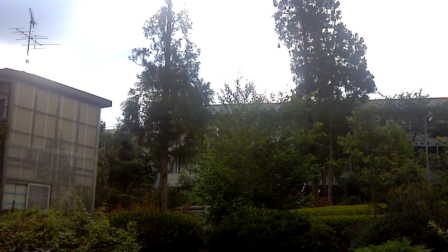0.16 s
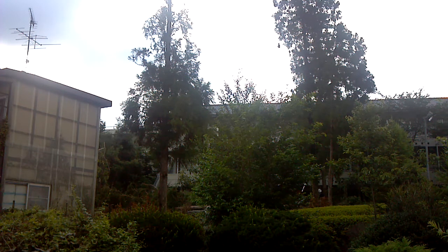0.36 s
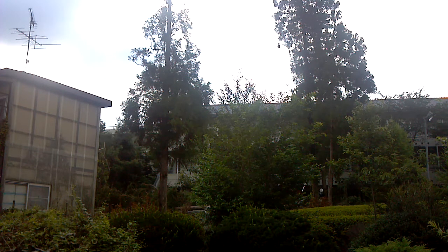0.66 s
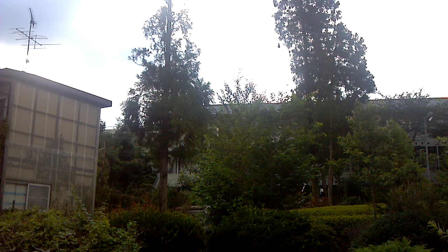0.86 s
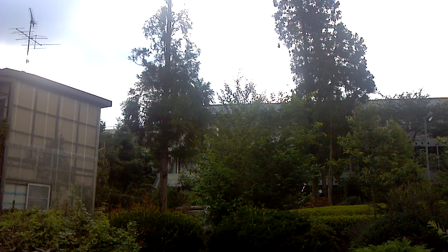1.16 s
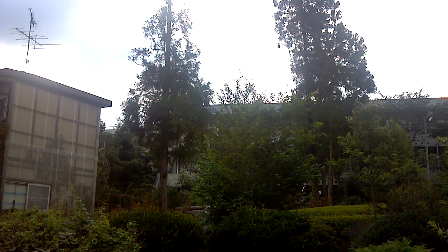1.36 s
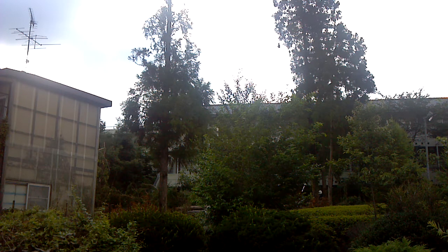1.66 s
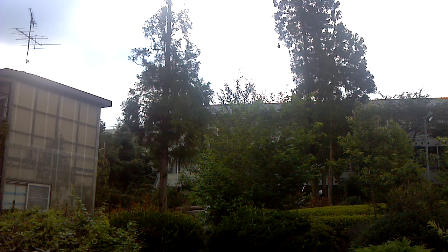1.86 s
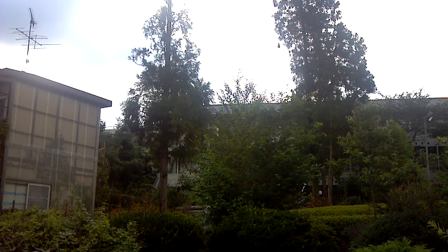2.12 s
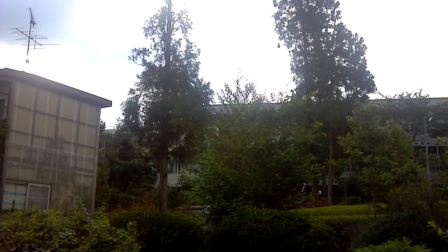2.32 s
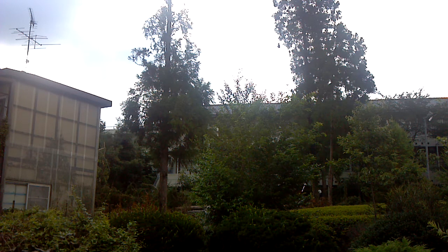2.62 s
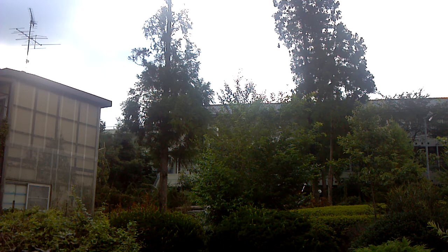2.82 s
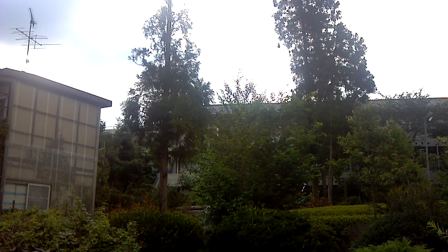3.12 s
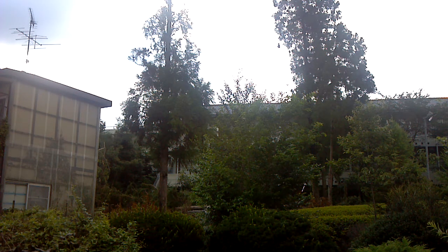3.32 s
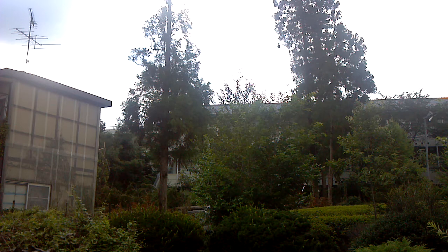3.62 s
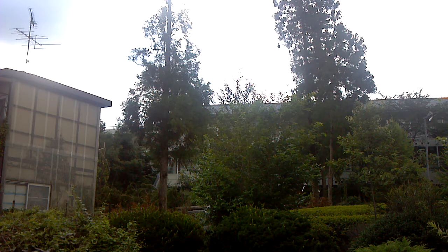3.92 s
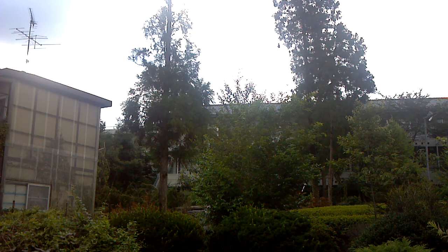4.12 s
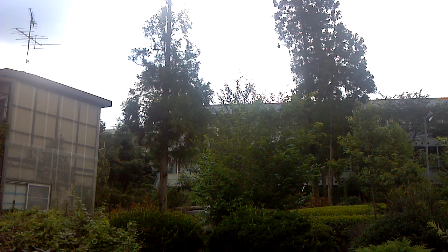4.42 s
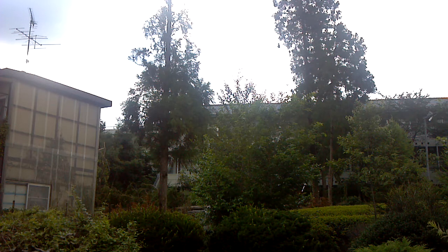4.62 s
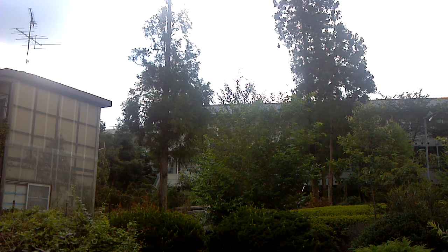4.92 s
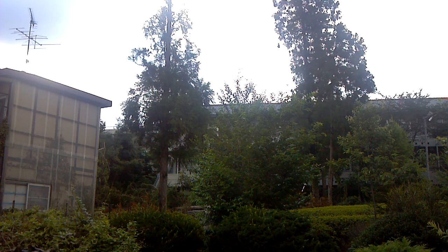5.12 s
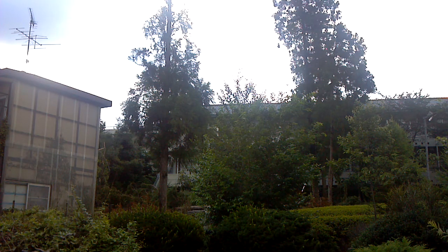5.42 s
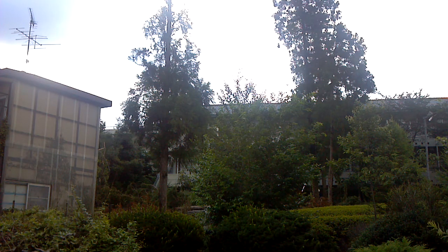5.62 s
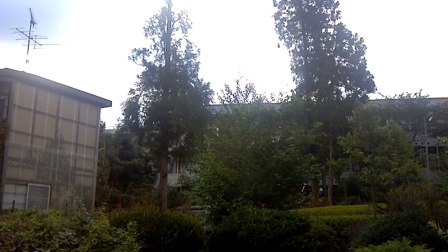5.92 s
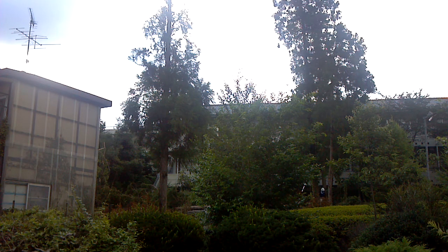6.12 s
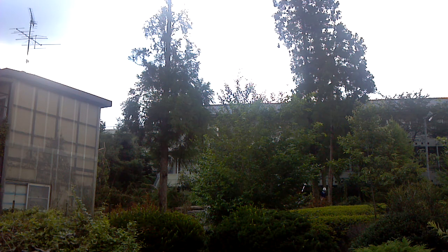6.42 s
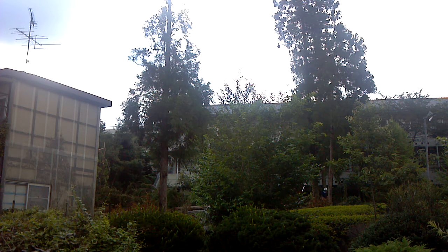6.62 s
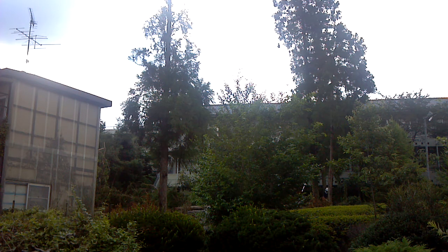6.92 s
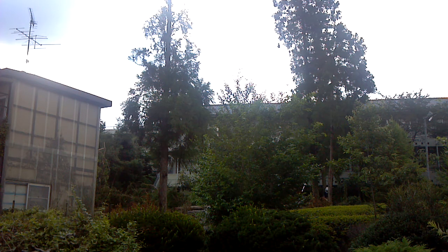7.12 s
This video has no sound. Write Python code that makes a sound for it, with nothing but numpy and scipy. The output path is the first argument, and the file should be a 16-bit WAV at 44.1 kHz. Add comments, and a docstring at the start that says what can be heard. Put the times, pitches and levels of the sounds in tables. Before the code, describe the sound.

A heavy hammer strikes a wedge in a trunk at some distance, six hard, dry knocks about a second apart, the third much weaker. Each has a steely crack, quick wall echoes and a hissing scatter in leaves. Underneath, high bush crickets buzz in swelling phrases, small birds chip and whistle, and air rushes softly. Blows stop before the end; a tiny dry tick follows.

```python
"""A heavy hammer drives a felling wedge into a trunk, some way off among trees and buildings.
Each blow sums a contact push, damped trunk modes and a noisy steel crack, then echoes and foliage scatter.
Bush crickets buzz in swelling phrases of pitch-sagging wing strokes.
Small birds chip and whistle with gliding tones; a dry tick snaps once.
Coloured noise makes a soft, distant rush."""
import sys
import numpy as np
from scipy import signal
from scipy.fft import rfft, irfft, next_fast_len
from scipy.io import wavfile
from scipy.ndimage import map_coordinates

SR = 44100
rng = np.random.default_rng(int(sys.argv[2]) if len(sys.argv) > 2 else 0)


def dump(signal):
    """Clip the signal to [-1, 1] and save it as 16-bit WAV at the path in sys.argv[1]."""
    limited = np.clip(np.atleast_2d(signal).T, -1, 1)
    pcm = np.round(limited * 32767).astype(np.int16)
    wavfile.write(sys.argv[1], SR, pcm)


N = 320607


def amp(db):
    """Decibels to gain."""
    return np.exp(np.asarray(db) * np.log(10) / 20)


def unit(x):
    """Scale to rms 1."""
    return x / np.sqrt(np.mean(x ** 2) + 1e-20)


def along(points, hz):
    """Interpolate (frequency [Hz], value) points on a log-frequency axis."""
    point_hz, value = np.transpose(points)
    return np.interp(np.log(hz + 1), np.log(point_hz + 1), value)


def curve(rows):
    """Interpolate (time [s], value) rows to one value per sample."""
    return np.interp(np.arange(N) / SR, *np.transpose(rows))


def wobble(knots_per_s):
    """Smooth random curve: a spline through Gaussian knots."""
    knots = rng.standard_normal(256)
    time_s = np.arange(0, N / SR + .01, .01)
    return curve(np.transpose([time_s, map_coordinates(knots, [time_s * knots_per_s])]))


def filtered(x, response):
    """Multiply the spectrum of x by a response of frequency."""
    size = next_fast_len(len(x) + 8192)
    hz = np.fft.rfftfreq(size, 1 / SR)
    return irfft(rfft(x, size) * response(hz), size)[:len(x)]


def noise(colour, size):
    """Coloured noise of rms 1."""
    white = rng.standard_normal(size)
    return unit(filtered(white, lambda hz: amp(along(colour, hz))))


def add(track, time_s, sound):
    """Mix a sound into the track, trimmed to its ends."""
    start = round(time_s * SR)
    part = sound[max(-start, 0):max(len(track) - start, 0)]
    track[max(start, 0):][:len(part)] += part


def fade(t, t60):
    """Exponential decay, 60 dB down after t60 seconds."""
    return np.exp(-np.log(1000) * t / t60)


def even_spectrum(burst, t, colour=1):
    """Give a burst a smooth magnitude spectrum, keeping its phases, and taper it to zero."""
    phases = np.exp(1j * np.angle(rfft(burst)))
    return irfft(colour * phases, len(t)) * (1 - t / t[-1]) ** 2


def hammer(foliage_db=-5.5):
    """The blows, each convolved with wall echoes, near leaves and diffuse foliage."""
    # hammer blows: (time [s], relative level [dB], contact pitch [Hz], deep wood boost [dB],
    # relative steel crack [dB], wall echo [dB])
    blows = [(0.0879, -19.5, 970, 4.5, -6, -2), (1.4498, -19.5, 960, 0.5, -4.5, -2.5),
             (2.311, -33.5, 1230, 12, 0.5, -2.5), (3.3831, -19.5, 972, -0.5, 0, -2.5),
             (4.339, -24.5, 1177, 2.5, 5, -4.5), (5.3375, -22, 1173, 1.5, 1, -3.5)]
    out = np.zeros(N)
    for time_s, db, contact_hz, deep_db, crack_db, echo_db in blows:
        hit = amp(db) * blow(contact_hz, deep_db, crack_db)
        response = amp(echo_db) * walls() + leaves() + amp(foliage_db) * foliage()
        add(out, time_s, hit)
        add(out, time_s, signal.fftconvolve(hit, response))
    return out


def blow(contact_hz, deep_db, crack_db, push_db=1.5, push_s=0.00079, deep_hz=950, attack_s=0.0027,
         radiate_hz=500):
    """A brief push of the wedge excites damped trunk modes and a crack of steel."""
    # trunk and wedge modes: (frequency [Hz], relative level [dB], t60 [s])
    trunk_modes = [(482, -44, 0.13), (631, -22.5, 0.08), (695.4, -6.5, 0.044), (798.4, -3, 0.026),
                   (943, 1, 0.019), (1045, -0.5, 0.025), (1178, -22.5, 0.048), (1368, -14, 0.067),
                   (1409, -22.5, 0.042), (1707, -16, 0.029), (1908, -23, 0.05), (1930, -8, 0.011),
                   (2370, -17, 0.043), (2840, -60, 0.042), (2985, -18, 0.028), (4600, -51, 0.033),
                   (6740, -27.5, 0.04)]
    t = np.arange(4096) / SR
    push_envelope = (t / push_s) * np.exp(1 - t / push_s)
    push = amp(push_db) * push_envelope * np.sin(2 * np.pi * contact_hz * t)
    hz, db, t60 = np.transpose(trunk_modes)[:, :, None]
    # each blow raises or lowers its deep modes by its own amount
    deep_boost_db = deep_db / (1 + (hz / deep_hz) ** 6)
    strength = amp(db + deep_boost_db + rng.normal(0, 1, hz.shape))
    modes = strength * fade(t, t60) * np.sin(2 * np.pi * hz * t)
    ring = np.sum(modes, axis=0) * (1 - np.exp(-t / attack_s))
    crack = amp(crack_db - 7) * snap(t, t60=0.024)
    # a slender trunk radiates almost no bass
    radiation = signal.butter(3, radiate_hz, "high", fs=SR, output="sos")
    return amp(0.5) * signal.sosfilt(radiation, push + ring + crack)


def snap(t, t60, rise_s=0.00015, air_hz=13000):
    """Steel crack: a dying, evenly coloured noise burst whose top is dulled by the air."""
    # crack of steel on the wedge: (frequency [Hz], relative density [dB per Hz])
    crack_colour = [(100, -38), (400, -12.5), (1200, 6), (2000, 7.5), (2800, -2), (3600, -8.5), (5000, -5),
                    (6700, -6), (7500, -20), (10000, -28.5), (15000, -38)]
    burst = rng.standard_normal(len(t)) * fade(t, t60)
    colour = amp(along(crack_colour, np.fft.rfftfreq(len(t), 1 / SR)))
    crack = even_spectrum(burst, t, colour) * (1 - np.exp(-t / rise_s))
    crack = signal.lfilter(*signal.butter(2, air_hz, fs=SR), crack)
    return crack * np.linalg.norm(burst) / np.linalg.norm(crack)


def walls():
    """Each surface returns a dulled mirror copy and a short, evenly coloured spray of scatter."""
    # echoing surfaces, levels before dulling, t60 before taper:
    # (delay [s], mirror [dB], scatter [dB], scatter t60 [s], low-pass [Hz])
    surfaces = [(.0034, -12, -5, 0.028, 6950), (.0111, -9, -2.5, 0.013, 1190),
                (0.0787, -15.5, -6, 0.071, 2900), (0.1709, -9.5, -9.5, 0.087, 1170),
                (.181, -11, -16, 0.1, 1200), (.61, -33, -25, 0.83, 1310)]
    response, t = np.zeros(SR), np.arange(SR // 3) / SR
    for delay_s, mirror_db, scatter_db, t60, dull_hz in surfaces:
        spray = even_spectrum(rng.standard_normal(len(t)) * fade(t, t60), t)
        scatter = amp(scatter_db) * spray / np.linalg.norm(spray)
        mirror = amp(mirror_db) * (t == 0)
        dulled = signal.lfilter(*signal.butter(2, dull_hz, fs=SR), scatter + mirror)
        add(response, delay_s, dulled)
    return response


def leaves(db=-1, t60=0.27, above_hz=8500):
    """Response of the nearest leaves: a short spray of the highest treble."""
    spray = rng.standard_normal(SR) * fade(np.arange(SR) / SR, t60)
    treble = signal.butter(4, above_hz, "high", fs=SR, output="sos")
    return amp(db) * signal.sosfilt(treble, spray / np.linalg.norm(spray))


def foliage(build_s=0.047):
    """Response of leaves and trunks: a diffuse tail whose treble dies first."""
    # scattered sound: (frequency [Hz], relative level [dB])
    scatter_colour = [(150, 7.5), (500, -1.5), (1000, -9.5), (2200, 0), (3300, 3), (5000, 3.5), (9000, 9.5),
                      (13000, -4)]
    # decay of the scatter: (frequency [Hz], t60 [s])
    scatter_t60 = [(200, 0.95), (1000, 0.94), (2500, 0.65), (5000, 0.46), (10000, 0.28)]
    hz, t, spectrum = signal.stft(rng.standard_normal(SR), SR, nperseg=256)
    shape = fade(t, along(scatter_t60, hz)[:, None]) * (1 - np.exp(-t / build_s))
    colour = amp(along(scatter_colour, hz))[:, None]
    tail = signal.istft(spectrum * shape * colour, SR, nperseg=256)[1][:SR]
    return tail / np.linalg.norm(tail)


def crickets(first_rate_hz=149, last_rate_hz=128, swell_s=0.28, stop_s=0.014):
    """Phrases swell while the wing beat slows, then stop short; others buzz farther away and join in."""
    # nearest cricket, phrase ends: (time [s])
    lead_stops = [0.269, 1.54, 2.814, 4.17, 5.56, 6.823]
    # lower-pitched neighbours, phrase ends: (time [s])
    answer_stops = [.47, 1.68, 2.9, 4.268, 4.98, 5.5, 6.13, 6.7, 7.24]
    # faint, lower-pitched cricket: (time [s], level [dB])
    low_trill = [(0, -82), (.8, -85.5), (1.9, -88), (3.0, -84), (3.6, -86), (7.27, -99)]
    far_hz, far_db, far_join_db = 6040, -82, 10  # carrier, resting level, rise with the nearest
    far_early_s, far_join_s = 0.35, 0.38  # peak ahead of the phrase end, half-width of the swell at 1/e
    out = np.zeros(N)
    # stops, carrier [Hz], level before the swell [dB], phrase length [s]
    for stops, carrier_hz, db, length_s in [(lead_stops, 6570, -66.5, .68),
                                            (answer_stops, 6395, -71, .74)]:
        t = np.arange(0, length_s, 1 / SR)
        swell = (1 - np.exp(-(t / swell_s) ** 2)) * np.minimum((t[-1] - t) / stop_s, 1)
        stroke_rate_hz = np.linspace(first_rate_hz, last_rate_hz, len(t))
        for stop in stops:
            add(out, stop - length_s, amp(db) * swell * stridulate(stroke_rate_hz, carrier_hz))
    t = np.arange(N) / SR
    joining = sum(np.exp(-((t - stop + far_early_s) / far_join_s) ** 2) for stop in lead_stops)
    far_buzz = stridulate(127 + 4 * wobble(3), far_hz, sweep=0.038, rasp=0.49)
    low_buzz = stridulate(120 + 4 * wobble(2.9), 5380, sweep=0.023, rasp=1.0)
    return out + amp(far_db + far_join_db * joining) * far_buzz + amp(curve(low_trill)) * low_buzz


def stridulate(rate_hz, carrier_hz, sweep=0.15, rasp=0.66):
    """Each wing stroke is a short tone that sags in pitch as the scraper slows."""
    strokes = np.cumsum(rate_hz) / SR + rng.random()
    index = strokes.astype(int)
    within = strokes - index
    detune, start, size_db = rng.standard_normal((3, 2048))
    # uneven teeth on the file jitter the phase several times a stroke
    jitter = np.interp(6 * strokes, np.arange(8192), rng.standard_normal(8192))
    pitch_hz = carrier_hz * (1 + sweep * (.5 - within) + 0.0059 * detune[index])
    tone = np.sin(2 * np.pi * np.cumsum(pitch_hz) / SR + np.pi * start[index] + rasp * jitter)
    stroke_envelope = (within * (1 - within)) ** 3
    return unit(tone * stroke_envelope * amp(size_db)[index])


def trills(bird_db=-2.0):
    """A small bird's runs of chips slow a little and arch in level and pitch."""
    # trills: (first chip [s], last chip [s], relative level [dB], crescendo over the trill [dB],
    # nominal pitch [Hz], pitch drift over the trill [Hz])
    trill_rows = [(.205, .63, -59, -2, 8380, -520), (1.029, 1.316, -60, 3, 7950, 700),
                  (1.35, 1.722, -56.5, -5, 8380, -250), (2.09, 2.482, -59.5, 4, 7980, 500),
                  (2.527, 2.909, -55.5, 6, 8420, -400), (3.076, 3.352, -52.5, 11, 8280, 350),
                  (3.473, 3.473, -45, 0, 8420, 0), (3.832, 4.155, -50.5, -2, 8320, -200),
                  (5.053, 5.493, -52.5, -1, 8460, -100), (6.349, 6.73, -54.5, 0, 8520, -150)]
    gap_s, slowing = .055, 0.065  # nominal chip spacing; share of slowing
    edge_db, edge_hz = 3.5, 150  # first and last chips are this much softer and lower
    scatter_db, scatter_hz = 0.5, 82  # standard deviation from chip to chip
    out = np.zeros(N)
    for first, last, db, crescendo_db, hz, drift_hz in trill_rows:
        for u in np.linspace(0, 1, round((last - first) / gap_s) + 1):
            time_s = first + (last - first) * (u - slowing * u * (1 - u))
            edge = (2 * u - 1) ** 2
            level_db = db + crescendo_db * (u - .5) - edge_db * edge + scatter_db * rng.normal()
            pitch_hz = hz + drift_hz * (u - .5) - edge_hz * edge + scatter_hz * rng.normal()
            note = chip(pitch_hz)
            add(out, time_s - len(note) / SR / 2, amp(level_db + bird_db) * note)
    return out


def chip(hz, half_s=0.0086, arch=0.21, width_s=0.005, uneven=0.25, wisp_db=-13, wisp_ratio=1.042):
    """A tone flicks up and down, loudest near its top, in varying widths under a faint second voice."""
    t = np.arange(-SR // 50, SR // 50) / SR
    stretch, lean, wisp = rng.standard_normal(3)
    flick = 1 - np.exp(-2 * (t / half_s / np.exp(uneven * stretch)) ** 2)
    phase = 2 * np.pi * np.cumsum(hz * (1.02 - arch * flick)) / SR
    second_voice = amp(wisp_db + 1.9 * wisp) * np.sin(wisp_ratio * phase)
    return (np.sin(phase) + second_voice) / np.cosh(t / width_s + uneven * lean) ** 2


def whistles(count=9, bird_db=-4.0):
    """A second bird: fading couplets of low slurs, then high slurs that each lead into a lower note."""
    # high calls: (time [s], note length [s], nominal top pitch [Hz], relative level [dB],
    # lower note's nominal top pitch [Hz], lower note's relative level [dB])
    high_calls = [(2.585, .115, 5850, -63, 4750, -59.5), (3.011, 0.14, 6170, -61.5, 4750, -60),
                  (3.494, 0.079, 6100, -57, 4020, -69), (3.888, 0.087, 5850, -59.5, 4100, -68.5),
                  (4.299, .08, 5920, -57, 4060, -70), (4.73, 0.076, 5830, -60, 4000, -74)]
    start_s, period_s, gap_s = .446, .474, .211  # couplets
    couplet_db, fade_db_per_s = -62.5, 2  # relative level and its fall
    lower_after_s = .157
    out = np.zeros(N)
    for k in range(count):
        since_s = k // 2 * period_s + k % 2 * gap_s
        note = slur(.085, 4240, octaves=.46, echo_db=0.5)
        add(out, start_s + since_s, amp(couplet_db - fade_db_per_s * since_s) * note)
    for time_s, length_s, top_hz, db, lower_hz, lower_db in high_calls:
        high_note = slur(length_s, top_hz, octaves=.66, echo_db=-4)
        lower_note = slur(length_s, lower_hz, octaves=0.44, echo_db=-6)
        add(out, time_s, amp(db) * high_note)
        add(out, time_s + lower_after_s, amp(lower_db) * lower_note)
    return amp(bird_db) * out


def slur(length_s, top_hz, octaves, echo_db, echo_s=.065, uneven=0.073, stray=.012, patchy_db=3):
    """A whistle slurs up and drops sharply, a little different each time; a wall repeats it."""
    # one slur: (share of length [0-1], share of depth below the top [ratio], relative level [dB])
    glide_points = [(0, 1, -18), (.18, .55, -4), (.45, .26, 0), (.68, 0, 0), (.82, .04, -3), (.91, .42, -5),
                    (1, 1.05, -12)]
    share, below, loud_db = np.transpose(glide_points)
    u = np.arange(0, 1, 1 / (length_s * SR))
    deeper, higher = rng.standard_normal(2)
    waver = stray * higher + 0.023 * np.sin(2 * np.pi * (3 * u + rng.random()))
    drop = octaves * np.exp(uneven * deeper) * np.interp(u, share, below)
    pitch_hz = top_hz * 2 ** (waver - drop)
    note = signal.windows.tukey(len(u), .1) * np.sin(2 * np.pi * np.cumsum(pitch_hz) / SR)
    out = np.zeros(SR // 2)
    # each path through the leaves favours other parts of the slur
    for delay_s, db in [(0, 0), (echo_s, echo_db)]:
        path_db = loud_db + patchy_db * rng.standard_normal(len(share))
        add(out, delay_s, amp(db + np.interp(u, share, path_db)) * note)
    return out


def falling_whistle(time_s=5.895, length_s=.09, db=-82, from_hz=4450, to_hz=4100):
    """A faint, distant sine sinks gently in pitch."""
    out = np.zeros(N)
    pitch_hz = np.linspace(from_hz, to_hz, round(length_s * SR))
    note = signal.windows.tukey(len(pitch_hz), .5) * np.sin(2 * np.pi * np.cumsum(pitch_hz) / SR)
    add(out, time_s, amp(db) * note)
    return out


def tick(time_s=6.8225, gain_db=-46.5, t60=0.018, low_hz=600, high_hz=4500):
    """A small dry snap close by: a band-passed, decaying noise burst."""
    out, t = np.zeros(N), np.arange(SR // 20) / SR
    burst = rng.standard_normal(len(t)) * fade(t, t60)
    band = signal.butter(1, [low_hz, high_hz], "band", fs=SR)
    add(out, time_s, amp(gain_db) * signal.lfilter(*band, burst))
    return out


def air(db=-64.5):
    """A soft distant rush: coloured noise that barely wavers."""
    # rush: (frequency [Hz], relative density [dB per Hz])
    air_colour = [(20, -18), (70, -30), (100, -26), (130, -20), (200, -13), (320, -7), (550, -3.5),
                  (850, -2), (1300, -7), (2200, -15), (4000, -23), (7500, -26.5), (10000, -29.5),
                  (15000, -29.5)]
    return amp(db + 0.37 * wobble(6.6)) * noise(air_colour, N)


def scene():
    """Mix the sources; birds and crickets also scatter in foliage."""
    buzz, near_bird, far_bird = crickets(), trills(), whistles() + falling_whistle()
    into_foliage = amp(-10.0) * buzz + amp(-15) * near_bird + amp(-11) * far_bird
    scattered = signal.oaconvolve(into_foliage, foliage())[:N]
    return (hammer() + tick() + buzz + near_bird + far_bird + scattered + air())[None]


def record(dry, top_hz=15250):
    """Brick-wall low-pass: nothing passes at or above top_hz."""
    return np.array([filtered(channel, lambda hz: hz < top_hz) for channel in dry])


dry = scene()
out = record(dry)
dump(out)
```